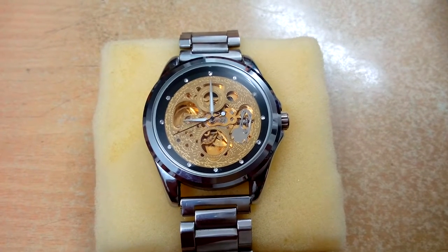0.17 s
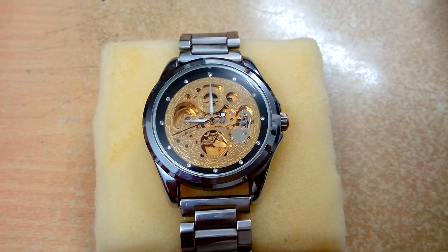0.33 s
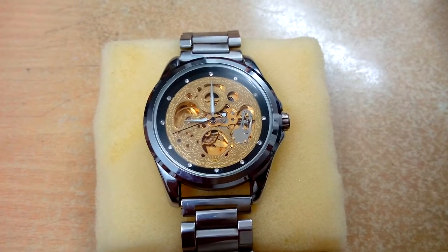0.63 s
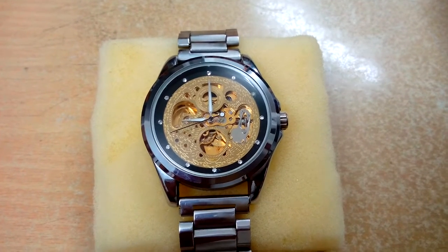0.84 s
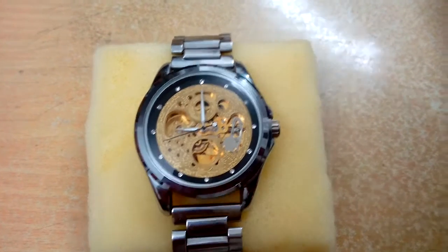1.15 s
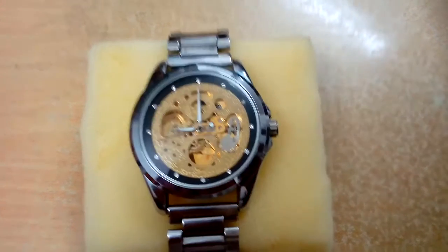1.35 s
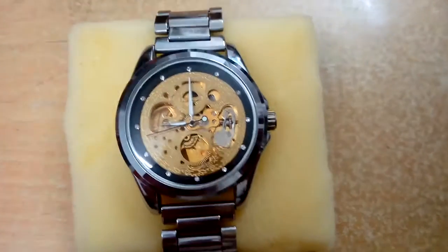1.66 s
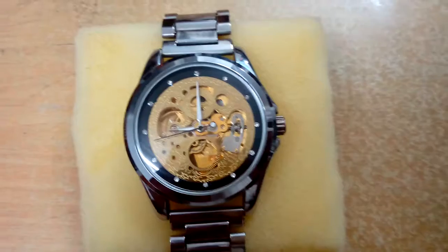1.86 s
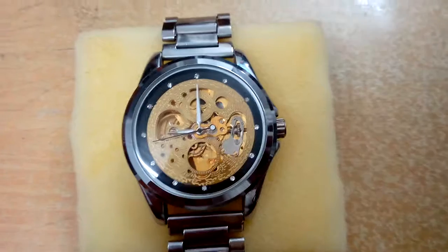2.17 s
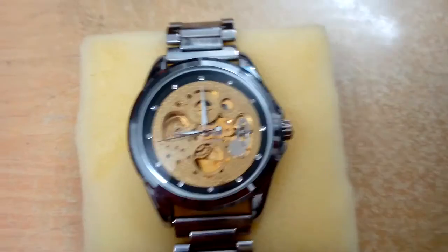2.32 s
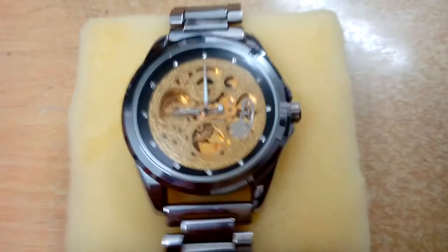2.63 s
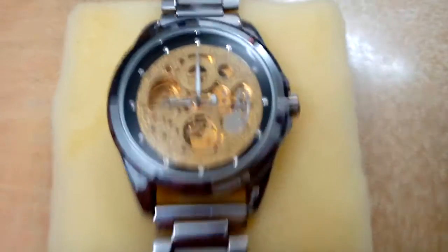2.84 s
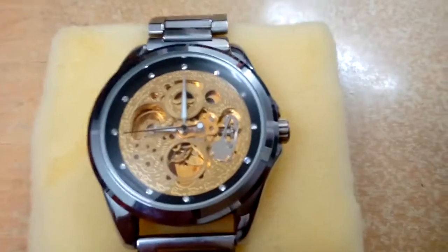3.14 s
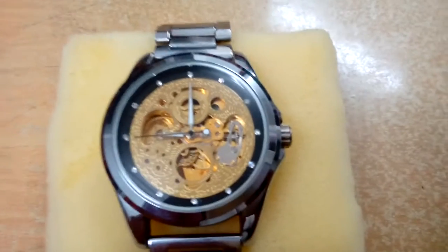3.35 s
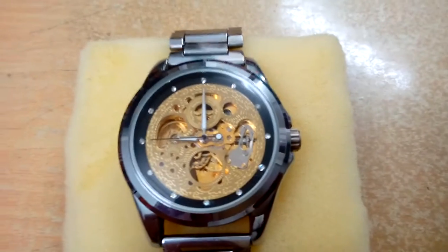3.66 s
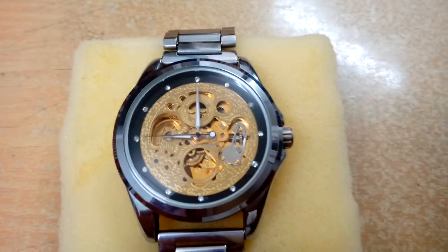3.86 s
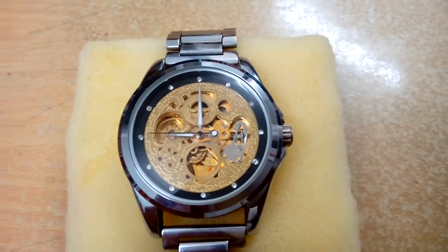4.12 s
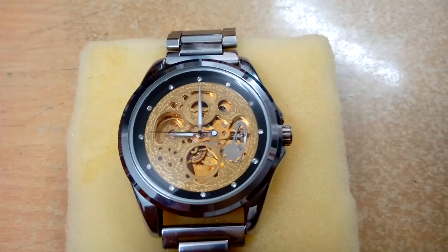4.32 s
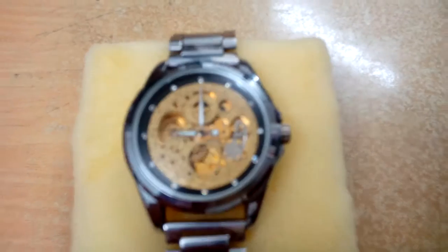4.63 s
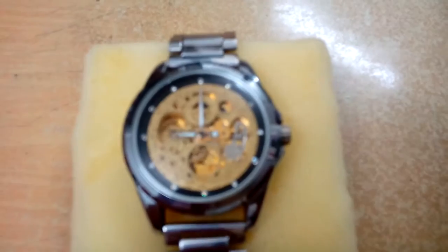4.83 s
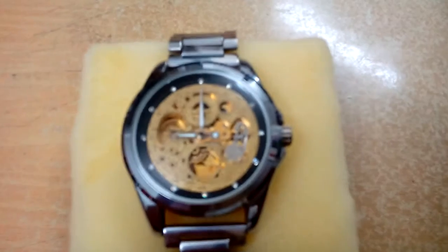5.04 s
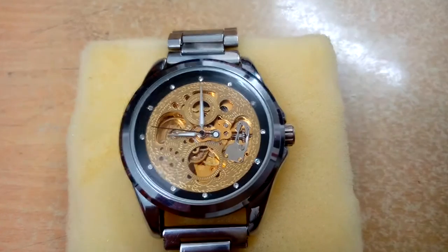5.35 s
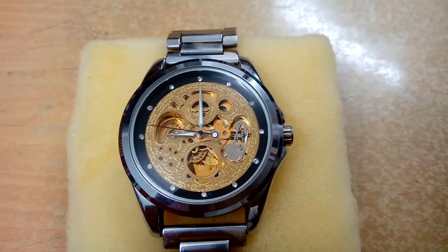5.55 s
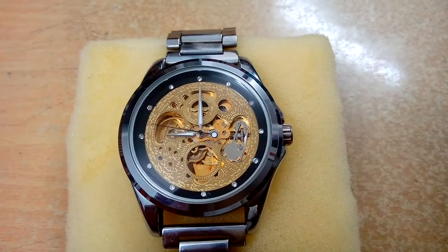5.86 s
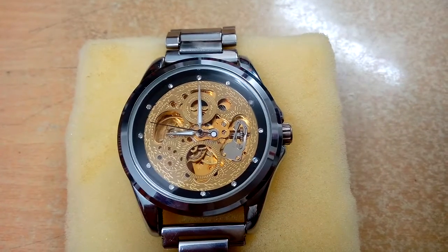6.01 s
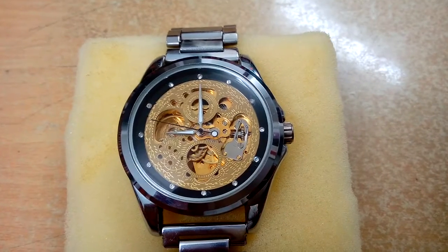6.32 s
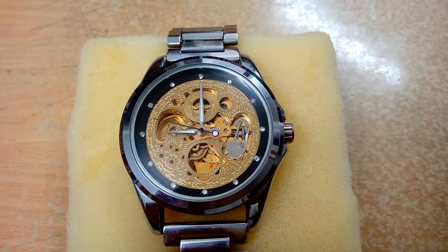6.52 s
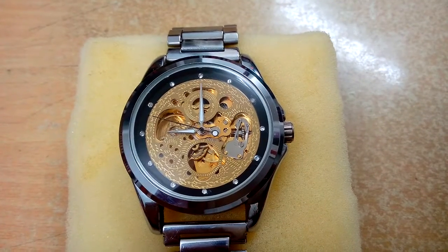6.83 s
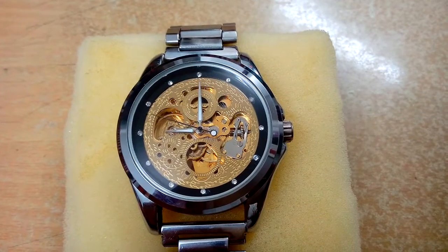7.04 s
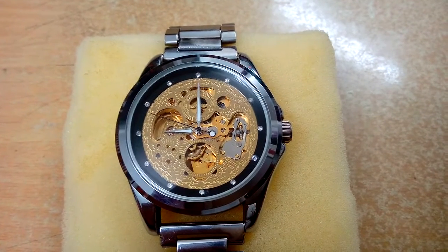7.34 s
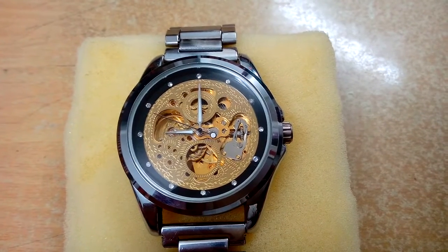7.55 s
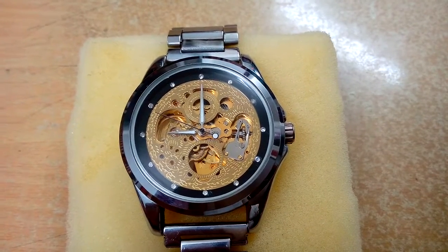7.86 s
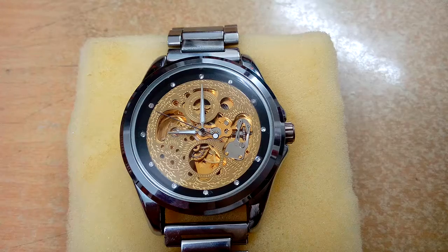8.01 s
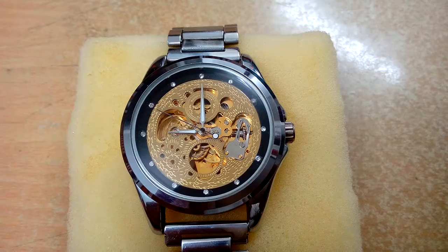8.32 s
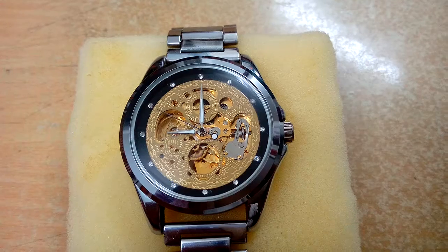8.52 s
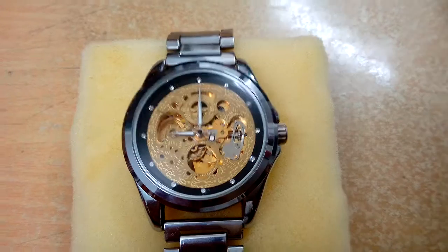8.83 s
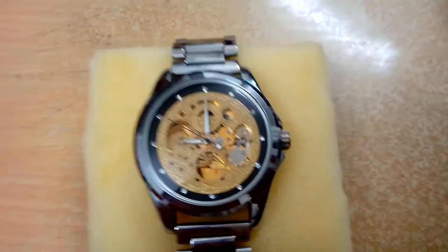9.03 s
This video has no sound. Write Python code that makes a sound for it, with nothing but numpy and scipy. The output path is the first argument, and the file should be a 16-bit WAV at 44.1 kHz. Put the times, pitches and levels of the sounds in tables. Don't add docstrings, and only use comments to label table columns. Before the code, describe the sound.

Very close, dry, almost mono pickup of a watch movement in a quiet room. Rapid even metallic ticking runs throughout, louder and softer beats in turn, with small grainy rubs and a slight bracelet rattle. A faint high whine appears briefly twice early on. The rhythm skips slightly ahead once past the middle, and a soft distant metal clink comes late over low hum and airy hiss.

```python
import sys
import numpy as np
from scipy import signal
from scipy.fft import irfft, next_fast_len
from scipy.io import wavfile
from scipy.ndimage import uniform_filter1d, map_coordinates

SR = 44100
rng = np.random.default_rng(int(sys.argv[2]) if len(sys.argv) > 2 else 0)


def materialize(psi):
    bounded = np.clip(np.atleast_2d(psi).T, -1, 1)
    quanta = np.round(bounded * 32767).astype(np.int16)
    wavfile.write(sys.argv[1], SR, quanta)


def gain_from_decibels(decibels):
    exponent = np.asarray(decibels, float) / 20
    return 10 ** exponent


N = 404838


def unit(x):
    return x / np.sqrt(np.mean(x ** 2) + 1e-20)


def curve(rows):
    t_s, level_db = np.transpose(rows)
    return np.interp(np.arange(N) / SR, t_s, level_db)


def wobble(rate_hz):
    steps = np.arange(0, N + 16, 16)
    knots = rng.standard_normal(int(N * rate_hz / SR) + 4)
    coarse = map_coordinates(knots, [steps * rate_hz / SR])
    return np.interp(np.arange(N), steps, coarse)


def noise(gain):
    size = next_fast_len(N)
    hz = np.fft.rfftfreq(size, 1 / SR) + 1
    spectrum = rng.standard_normal((len(hz), 2)) @ [1, 1j]
    return unit(irfft(spectrum * gain(hz), size)[:N])


def shaped(points):
    f, db = np.transpose(points)
    return lambda hz: gain_from_decibels(np.interp(np.log(hz), np.log(f), db, left=-120, right=-120))


def peaked(peaks):
    return lambda hz: sum(gain_from_decibels(db) / (1 + (2 * (hz - c) / w) ** 2) for c, w, db in peaks)


def patchy(x, depth_db):
    z = signal.stft(x, nperseg=512)[2]
    field = uniform_filter1d(rng.standard_normal(z.shape), size=5, axis=0)
    field = uniform_filter1d(field, size=9, axis=1)
    return unit(signal.istft(z * gain_from_decibels(depth_db * unit(field)), nperseg=512)[1][:N])


def ring(modes, attack_s, scatter_db, detune):
    t = np.arange(int(max(m[2] for m in modes) * SR)) / SR
    luck = rng.standard_normal((len(modes), 3))
    x = np.zeros(len(t))
    for (hz, db, t60), (a, b, c) in zip(modes, luck):
        decay = gain_from_decibels(db + scatter_db * a - 60 * t / t60)
        pitch = hz * (1 + detune * b)
        x += decay * np.sin(2 * np.pi * pitch * (t - 2 * attack_s) + 0.55 * c)
    x = x * (1 - np.exp(-t / attack_s)) ** 2
    return x / np.max(np.abs(x))


def add(track, t_s, sound):
    part = track[round(t_s * SR):][:len(sound)]
    part += sound[:len(part)]


# t/s, plate level/dB, bridge level/dB, prior impulse level/dB
ENTRY_DROPS = [(0.0372, -20, -26.5, -41), (0.4365, -18, -27, -40), (0.836, -19, -24, -44),
               (1.2353, -29.5, -29, -36), (1.6342, -16, -26, -42), (2.0336, -18, -26, -39),
               (2.4325, -22, -26, -34), (2.8326, -20.5, -25.5, -39), (3.2311, -17.5, -26.5, -39.5),
               (3.63, -18.5, -26.5, -40.5), (4.0302, -16.5, -26, -37), (4.4301, -18, -27.5, -42),
               (4.8287, -14.5, -26, -37), (5.2282, -18, -26, -36), (5.6285, -18, -26.5, -42),
               (6.005, -17.5, -23.5, -42), (6.4045, -16, -26.5, -42), (6.8037, -19, -25, -39.5),
               (7.2032, -17.5, -25, -41), (7.602, -16, -25.5, -42.5), (8.0005, -15.5, -26.5, -43),
               (8.3997, -18.5, -27.5, -35), (8.7993, -19, -29.5, -39)]
EXIT_DROPS = [(0.233, -31.5, -27.5, -41), (0.6317, -32, -36, -34), (1.032, -26, -28, -41),
              (1.4314, -25.5, -28.5, -40), (1.8312, -33, -27.5, -36), (2.231, -32, -29.5, -42),
              (2.63, -33, -29.5, -37), (3.0287, -24, -26, -37.5), (3.4275, -28, -27, -35.5),
              (3.8276, -22, -24, -38), (4.2265, -32, -27, -41), (4.6252, -27.5, -25.5, -40),
              (5.025, -30, -27, -38), (5.4253, -31.5, -27, -38.5), (5.8013, -23, -28.5, -43),
              (6.201, -28.5, -26, -41), (6.5993, -21, -31, -39), (7.0, -23.5, -25.5, -44),
              (7.3985, -25.5, -26.5, -37), (7.7982, -26.5, -25, -50), (8.1973, -30, -26, -42.5),
              (8.5971, -31, -27, -40), (8.996, -22.5, -24, -41)]
# lead t/s, plate level/dB, bridge level/dB
ENTRY_LEADS = [
    (0.0335, -66, -56.5),
    (0.0092, -49, -42),
]
EXIT_LEADS = [
    (0.0337, -50.5, -44.5),
    (0.025, -46, -43),
    (0.012, -47, -53),
    (0.0065, -55, -53),
]


def beats():
    pairs = []
    for tick, tock in zip(ENTRY_DROPS, EXIT_DROPS):
        pairs += [(tick, ENTRY_LEADS), (tock, EXIT_LEADS)]
    return pairs


# f/Hz, level/dB, t60/s
PLATE_MODES = [(5020, -9, .008), (5440, 0, .0105), (5690, -4, .009), (5980, -4, .008)]
# f/Hz, level/dB, t60/s
BRIDGE_MODES = [(7054, 7.5, 0.011), (7470, 3, 0.0095), (8180, -17.5, 0.039), (10510, -24, 0.012),
                (11420, -8.5, 0.008)]
# f/Hz, level/dB, t60/s
PALLET_MODES = [(15080, 0, .028)]


def contact(track, crack, t_s, plate_db, bridge_db):
    rebound_s = .001 + .0012 * rng.random()
    for lag_s, db in ((0, 0), (rebound_s, -14)):
        add(track, t_s + lag_s, gain_from_decibels(plate_db + db) * ring(PLATE_MODES, .0004, 3, .009))
        add(track, t_s + lag_s, gain_from_decibels(bridge_db + db / 2 - 1) * ring(BRIDGE_MODES, .0003, 3.5, .012))
    since = np.arange(SR // 50) / SR - .004
    crack_db = bridge_db - 29 + 3.3 * rng.standard_normal()
    add(crack, max(t_s - .0035, 0), gain_from_decibels(crack_db + np.minimum(6000 * since, -60 * since / .012)))
    pallet_db = bridge_db - 41 + 3 * rng.standard_normal()
    add(track, t_s, gain_from_decibels(pallet_db) * ring(PALLET_MODES, .0008, 0, .003))


# f/Hz, level/dB, t60/s
CASE_MODES = [(3150, -12, .02), (3680, 0, .022), (4240, -4, .016)]
# f/Hz, level/dB, t60/s
JEWEL_MODES = [(11600, 0, 0.07), (11000, -3, 0.07), (9000, -5, 0.06)]
# f/Hz, level/dB, t60/s
SPRING_MODES = [(7384, 0, 0.13)]
ENTRY_SPRING_DB = [-75, -64, -73, -66, -81, -68, -61, -66, -73, -64, -65, -67, -65, -67, -79, -69, -71, -69,
                   -74, -78, -71, -70, -75]
EXIT_SPRING_DB = [-71, -75, -68, -74, -67, -73, -66, -65, -73, -73, -67, -65, -67, -65, -71, -77, -73, -66,
                  -81, -72, -64, -74, -72]
# f/Hz, width/Hz, level/dB
BRACELET_BAND = [(1920, 150, 0)]
BRACELET_DB = [-70, -62, -63, -60, -57.5, -57, -56, -54, -50, -54, -54, -56.5, -56, -53, -69, -54.5]
# f/Hz, level/dB
CRACK_SPECTRUM = [(8300, -15), (9000, 6), (11600, -2), (13000, 4), (15300, -47), (16000, -50)]
# f/Hz, level/dB
HISS_SPECTRUM = [(2500, -22), (4500, -2.5), (6000, 1.5), (7500, -3.5), (7900, -17), (8300, -22.5),
                 (9500, -62)]


def escapement():
    track, crack, wash, clatter = np.zeros((4, N))
    t = np.arange(SR // 8) / SR
    rise_s = 0.035
    since = t - rise_s
    shake_db = np.minimum(33 * since / rise_s, -60 * since / 0.15)
    for beat, ((t_s, plate_db, bridge_db, impulse_db), leads) in enumerate(beats()):
        impulse = (0.019, impulse_db, impulse_db)
        for early_s, lead_plate_db, lead_bridge_db in [*leads, impulse]:
            jitter_s, a, b = rng.standard_normal(3) * [0.00063, 2.5, 2.5]
            lead_s = max(t_s - early_s + jitter_s, .001)
            contact(track, crack, lead_s, lead_plate_db + a, lead_bridge_db + b)
        contact(track, crack, t_s, plate_db, bridge_db)

        case_db = -40 + 0.5 * rng.standard_normal()
        add(track, t_s, gain_from_decibels(case_db) * ring(CASE_MODES, 0.000328, 1.3, 0.015))
        rattle_db = -64.5 + 2 * rng.standard_normal() if beat % 3 else BRACELET_DB[beat // 3]
        add(clatter, t_s - rise_s, gain_from_decibels(rattle_db - 3.5 + shake_db))
        jewel_db = -72.5 + 10.5 * rng.standard_normal()
        add(track, t_s, gain_from_decibels(jewel_db) * ring(JEWEL_MODES, 0.0017, 4, 0.019))
        spring_db = (ENTRY_SPRING_DB, EXIT_SPRING_DB)[beat % 2][beat // 2] + 15.5
        add(track, t_s, gain_from_decibels(spring_db) * ring(SPRING_MODES, 0.00291, 0, 0.0049))
        add(wash, t_s, gain_from_decibels(plate_db - 36.5 - 60 * t / 0.15))
    return (track + crack * noise(shaped(CRACK_SPECTRUM)) + wash * noise(shaped(HISS_SPECTRUM))
            + clatter * noise(peaked(BRACELET_BAND)))


TURN_BRIGHT_DB = [-59, -58, -66, -56, -81, -69, -56.5, -73, -73, -57, -78, -55, -56, -55, -55]
# t/s, case level/dB
DULL_RUBS = [(0.184, -55), (0.773, -53), (1.923, -50), (3.125, -50), (3.717, -49), (4.316, -49.5),
             (4.911, -48.5), (5.5, -50.5), (6.074, -47.5), (7.895, -49.5)]


def rubs():
    turns_s = .304 + .6013 * np.arange(len(TURN_BRIGHT_DB))
    turns_s = turns_s - .025 * (turns_s > 5.65)
    regular = [(t_s, -47, db) for t_s, db in zip(turns_s, TURN_BRIGHT_DB)]
    return regular + [(t_s, db, db - 19) for t_s, db in DULL_RUBS]


# lead t/s, length t/s, entry level/dB, exit level/dB
PALLET_DRAGS = [
    (0.036, 0.025, -68, -55),
    (0.018, 0.022, -54, -50),
]
# f/Hz, width/Hz, level/dB
RUB_BANDS = [(5460, 2100, 8), (7350, 880, 12.5)]


def friction():
    case, bright = np.zeros((2, N))
    t = np.arange(SR // 4) / SR
    for beat, ((t_s, *_), _) in enumerate(beats()):
        for early_s, length_s, *side_db in PALLET_DRAGS:
            drag_db = side_db[beat % 2] + 0.5 * rng.standard_normal()
            add(case, max(t_s - early_s, 0), gain_from_decibels(drag_db) * np.hanning(round(length_s * SR)))
        add(case, t_s, gain_from_decibels(-55.5 - 60 * t / 0.14))
    fade = (1 - np.exp(-t / 0.0031)) * (gain_from_decibels(-60 * t / 0.051) + .5 * gain_from_decibels(-60 * t / .5))
    for t_s, case_db, bright_db in rubs():
        add(case, t_s, gain_from_decibels(case_db - 5) * fade)
        add(bright, t_s, gain_from_decibels(bright_db + 2.5) * fade)
    grain = unit(gain_from_decibels(3 * wobble(300)))
    body = peaked([(hz, 130, db) for hz, db, _ in CASE_MODES] + [(3750, 1100, -9)])
    upper = peaked(RUB_BANDS)
    case_noise = noise(lambda hz: body(hz) * (hz < 8000))
    bright_noise = noise(lambda hz: upper(hz) * (hz < 8000))
    return grain * (case * case_noise + bright * bright_noise)


# f/Hz, level/dB, t60/s
KNOCK_MODES = [(1164, 1, 0.45), (1182, -13, 1), (1916, -9, 0.25)]
# t/s, level/dB
KNOCK_AT = (8.399, -44.5)
# f/Hz, level/dB
ECHO_SPECTRUM = [(700, -6), (1000, -4), (1300, -6), (2500, -9), (4000, -5), (5000, -13)]


def knock():
    track, echo = np.zeros((2, N))
    t = np.arange(SR // 2) / SR
    t_s, level_db = KNOCK_AT
    add(track, t_s, gain_from_decibels(level_db) * ring(KNOCK_MODES, 0.00199, 0, 0))
    add(echo, t_s, gain_from_decibels(level_db - 10 - 60 * t / 1.2))
    return track + echo * noise(shaped(ECHO_SPECTRUM))


# t/s, level/dB
WHINE_LEVEL = [(0, -56), (.35, -71), (.5, -95), (1.6, -89), (1.76, -56), (1.95, -51), (2.3, -64.5),
               (2.6, -62), (2.9, -99)]


def whine():
    t = np.arange(N) / SR
    level = gain_from_decibels(curve(WHINE_LEVEL) - 6 + 3.5 * wobble(25))
    tone = level * np.sin(2 * np.pi * 4441 * t + 1.2 * wobble(25))
    return tone + gain_from_decibels(-66) * (np.abs(t - .38) < .18) * noise(peaked([(3170, 30, 0)]))


# f/Hz, level/dB
HUM_SPECTRUM = [(12, -24), (20, -15), (32, -8.5), (53, -14.5), (71, -1), (147, -5.5), (174, -2), (211, -6),
                (308, -5.5), (427, -11), (528, -12.5), (573, -9.5), (1000, -26.5), (1300, -62),
                (2200, -120)]
# f/Hz, width/Hz, level/dB
HUM_BANDS = [(129.6, 2.4, -65), (177.85, 3, -67), (572.5, 2.9, -75)]
# centre t/s, length t/s, level/dB
HUM_SWELLS = [(0.206, 0.15, -52.5), (0.566, 0.08, -52), (1.06, 0.052, -56), (2.047, 0.21, -50),
              (3.0, 0.25, -57.5), (3.5, 0.5, -54.5), (4.134, 0.13, -59), (4.803, 0.27, -53),
              (5.42, 0.22, -53), (5.934, 0.16, -52.5), (6.448, 0.14, -55), (6.72, 0.11, -57),
              (7.194, 0.12, -54), (7.53, 0.074, -51.5), (8.587, 0.34, -55.5), (9.18, 0.27, -50)]


def hum():
    t = np.arange(N) / SR
    broad = gain_from_decibels(-52) * patchy(noise(shaped(HUM_SPECTRUM)), 1.87)
    bands = sum(gain_from_decibels(db) * noise(peaked([(hz, width, 0)])) for hz, width, db in HUM_BANDS)
    coarse = t[::64]
    swells = sum(gain_from_decibels(db) * np.exp(-((coarse - s) / length) ** 2) for s, length, db in HUM_SWELLS)
    throb = np.interp(t, coarse, swells) * np.sin(2 * np.pi * 65.5 * t + 3.15 * wobble(5.4))
    return broad + bands + throb


# f/Hz, level/dB
AIR_SPECTRUM = [(500, -11), (800, 0.5), (1400, -2), (2400, -5.5), (3000, -2), (3700, -1), (4400, -7.5),
                (5500, -33), (7000, -49)]
# t/s, level/dB
STREET_LEVEL = [(0.0, -67.5), (0.36, -66.5), (1.56, -69), (7.57, -65), (8.44, -68.5), (8.59, -65.5),
                (8.85, -69), (9.18, -66.5)]
# t/s, level/dB
DRAUGHT_LEVEL = [(0.0, -69.5), (1.43, -65), (1.74, -70.5), (2.1, -61.5), (3.6, -69), (4.5, -67),
                 (4.6, -70.5), (5.65, -69), (5.83, -74.5), (6.11, -69), (8.46, -67.5), (9.18, -68.5)]


def air_and_hiss():
    air_db = curve(STREET_LEVEL) + 4.5 + 0.8 * wobble(3)
    hiss_db = curve(DRAUGHT_LEVEL) + 3 + 0.55 * wobble(6)
    return (gain_from_decibels(air_db) * patchy(noise(shaped(AIR_SPECTRUM)), 3.65)
            + gain_from_decibels(hiss_db) * patchy(noise(shaped(HISS_SPECTRUM)), 2.5))


def scene():
    mono = escapement() + friction() + knock() + whine() + hum() + air_and_hiss()
    return np.array([mono, mono])


# t/s, length t/s
FLICKERS = [(0.34, 0.5), (1.43, 0.13), (2.71, 0.49), (6.08, 0.38), (6.87, 1.03), (8.07, 0.7)]


def flicker_gate():
    gate = np.zeros(N)
    for t_s, length_s in FLICKERS:
        add(gate, t_s, np.ones(round(length_s * SR)))
    return np.abs(uniform_filter1d(gate * (wobble(25) > -0.2), size=500))


def roll_off(x):
    return signal.sosfilt(signal.butter(12, 16440, fs=SR, output="sos"), x)


# f/Hz, level/dB
TOP_SPECTRUM = [(8000, -20), (8500, 0), (15500, -3), (15800, -40)]
# f/Hz, level/dB
SIDE_SPECTRUM = [(24, -65), (40, -35), (218, -32), (301, 8), (548, 1), (5170, 6), (15500, -18)]


def record(dry):
    gate = flicker_gate()
    top = gain_from_decibels(-91) * gate * noise(shaped(TOP_SPECTRUM))
    side = gain_from_decibels(-80.5) * gate * patchy(noise(shaped(SIDE_SPECTRUM)), 3.9)
    return roll_off(dry + top + np.array([side, -side]))


dry = scene()
out = record(dry)
materialize(out)
```